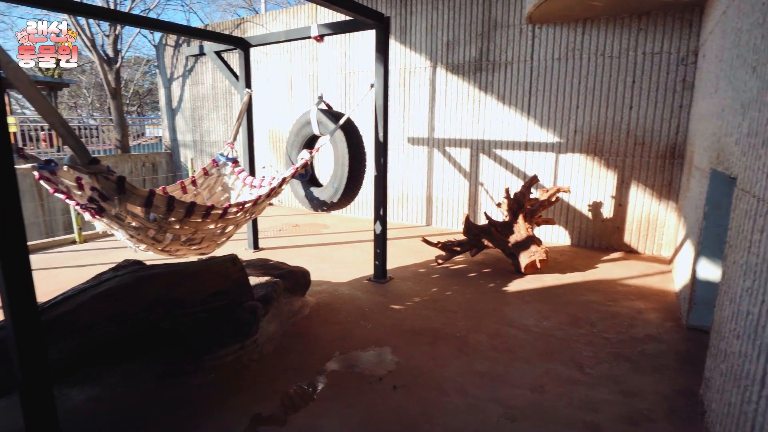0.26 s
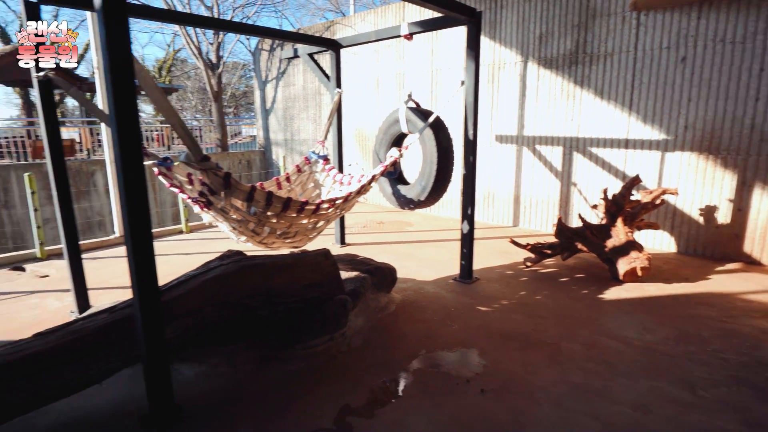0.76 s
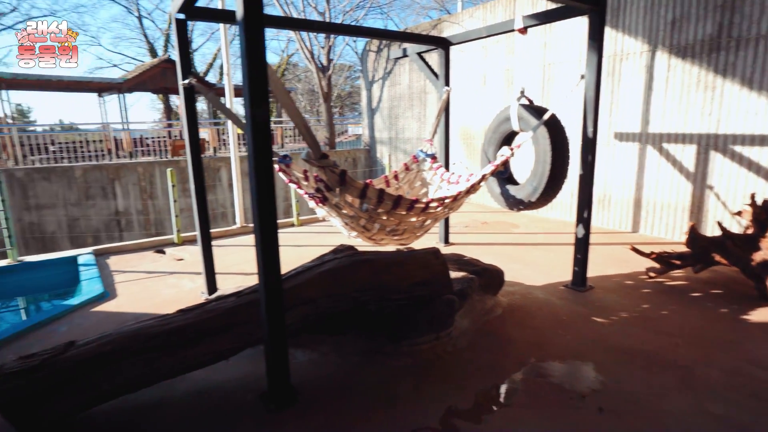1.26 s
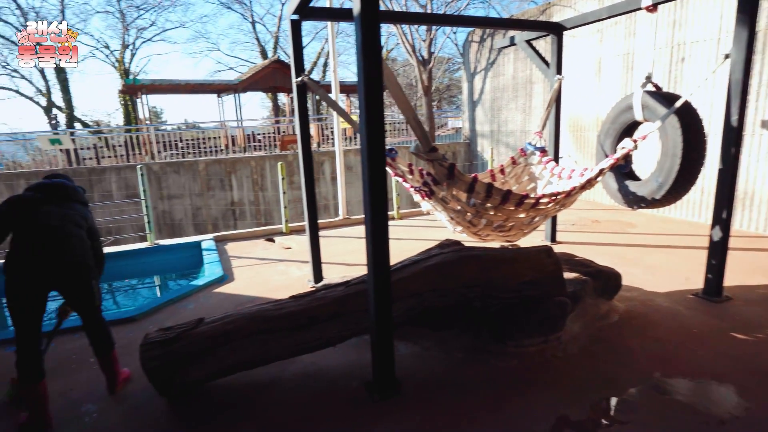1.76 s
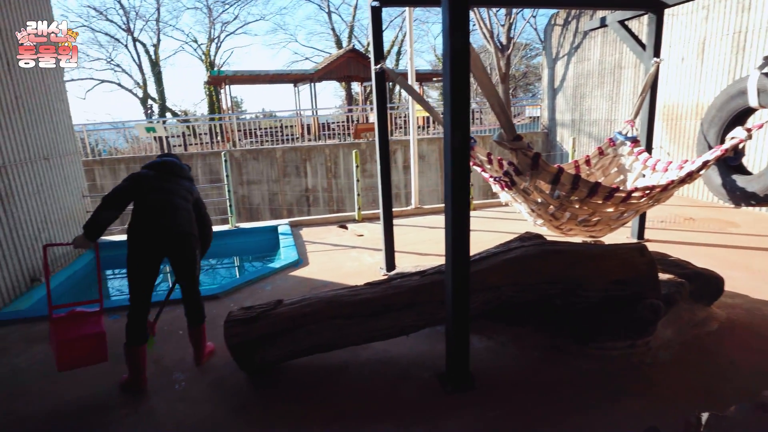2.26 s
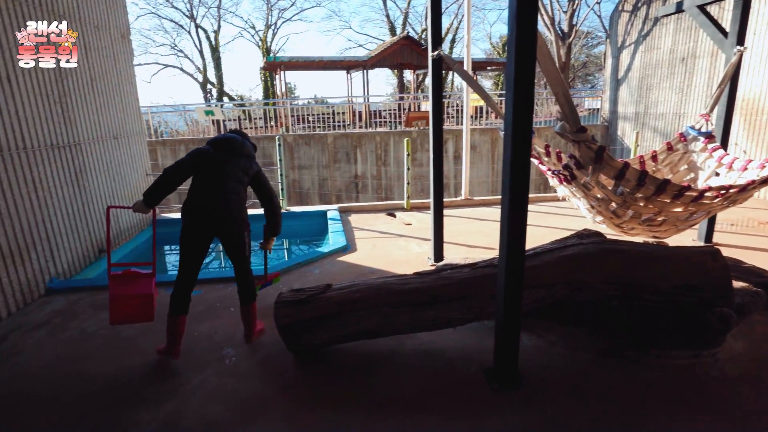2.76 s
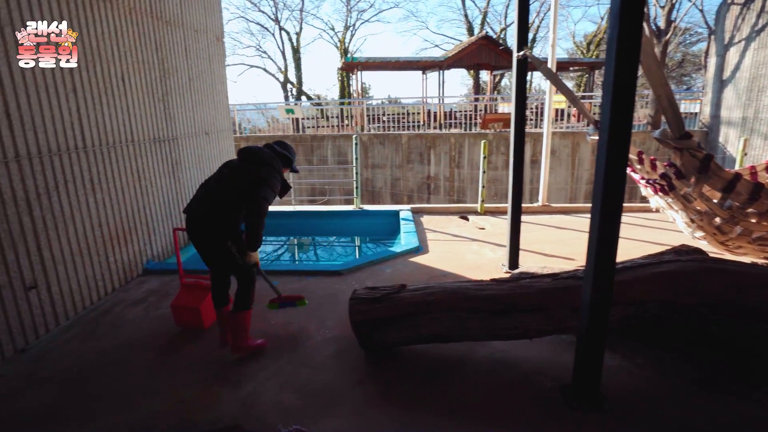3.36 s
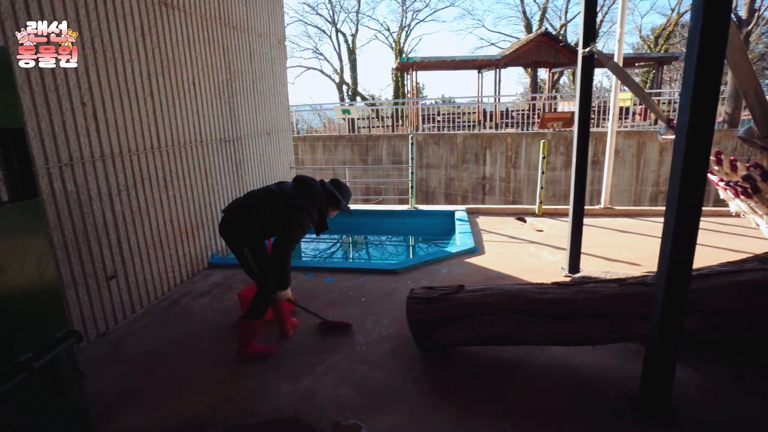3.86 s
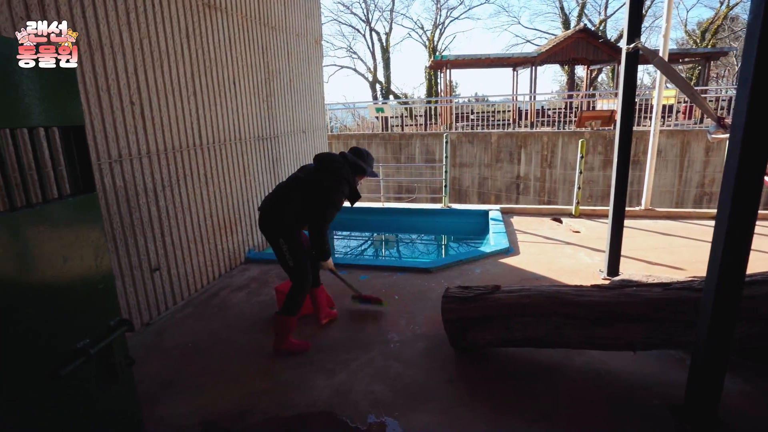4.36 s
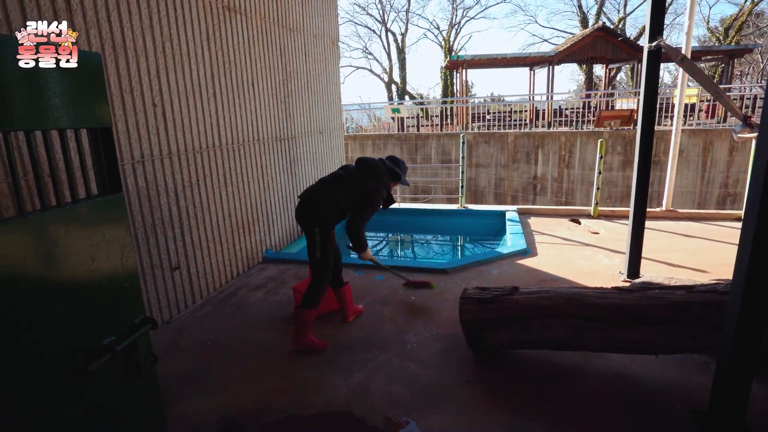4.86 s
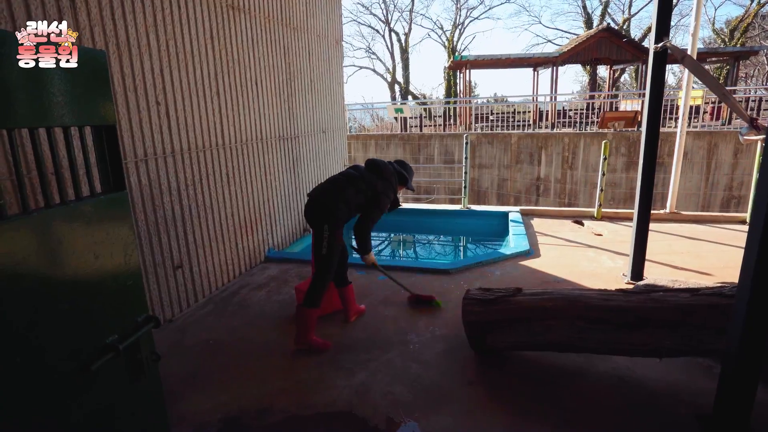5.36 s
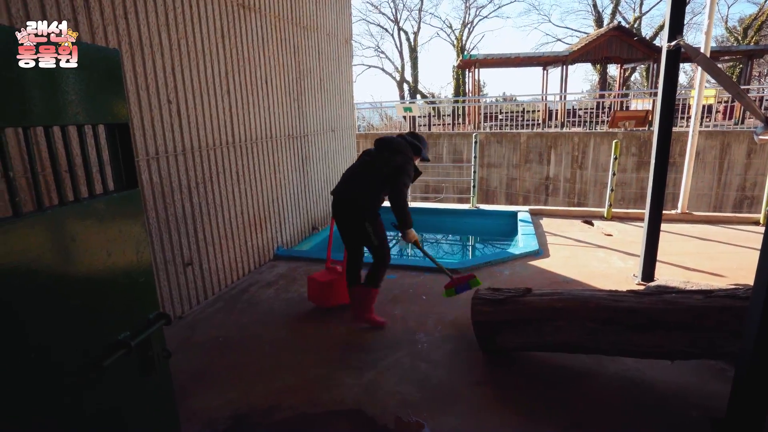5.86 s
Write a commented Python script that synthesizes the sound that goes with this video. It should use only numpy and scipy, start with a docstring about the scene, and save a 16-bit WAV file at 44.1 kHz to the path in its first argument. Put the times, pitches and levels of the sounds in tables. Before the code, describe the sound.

A plastic dustpan bumps and clatters, then bristles scrape gritty concrete in repeated bright strokes, with faint outdoor hush and short wall echoes.

```python
"""A plastic broom sweeps a cement floor in a walled outdoor yard, a few metres from two close microphones.
A faint outdoor hush, drifting filtered noise, lies under everything. At first a hollow plastic dustpan bumps
about (ringing modes of plastic and yard, a noisy clatter) while boots scuff (stick-slip snaps) and bristles land.
Then longer strokes take over: bristle tips rasp along the grit as dense snaps that swell and fade, with
the pressure easing off. The walls answer with a short tail of scattered echoes."""
import sys
import numpy as np
from scipy import signal
from scipy.fft import rfft, irfft
from scipy.io import wavfile

SR = 44100
rng = np.random.default_rng(int(sys.argv[2]) if len(sys.argv) > 2 else 0)


def master_out(mix):
    """Clip the mix to full scale and print it as 16-bit PCM to the path in sys.argv[1]."""
    frames = np.transpose(np.atleast_2d(mix))
    ceiling = np.clip(frames, -1, 1)
    pcm = np.round(ceiling * 32767).astype(np.int16)
    wavfile.write(sys.argv[1], SR, pcm)


N = 269010
TIME = np.arange(N) / SR
FREQS = np.fft.rfftfreq(N, 1 / SR)

# colour of bristle tips on grit: freq_hz, level_db
BRISTLE_HISS = [(300, -43), (900, -9), (1500, -7.5), (2100, -4), (3000, -2.5), (4500, -0.5), (6500, -1),
                (8700, -2.5), (10500, 0), (12500, 1.9), (15500, -1)]
# colour of rubber and plastic dragged over cement: freq_hz, level_db
SOLE_COLOUR = [(60, -31), (150, 4), (300, 1.5), (700, -2), (1200, -5), (2200, -25), (3500, -38),
               (7000, -32), (16000, -21)]
# ringing modes of the knocks, the hollow plastic and the yard's low resonances together:
# freq_hz, level_db (relative), t60_s (before each blow's length factor)
KNOCK_MODES = [(94, -5, 0.44), (129.5, -5.5, 0.47), (156.5, -0.5, 0.12), (162.9, -0.5, 0.45),
               (176.2, -4, 0.7), (233.3, -3, 0.85), (249.6, -7, 0.95), (284.6, 9, 0.25), (351.6, 3.5, 0.18),
               (388, -10.5, 0.55), (431.8, -2.5, 0.24), (479, -18.5, 0.34), (569, -2.5, 0.056),
               (779, -2.5, 0.26), (838, -13, 0.24), (952, -6, .3), (1310, -5.5, 0.45), (1870, 0, 0.16)]


def gain_of(db):
    """Decibels to amplitude."""
    return 10 ** (np.asarray(db) / 20)


def evened(x):
    """Scales to rms 1."""
    return x / np.sqrt(np.mean(x ** 2) + 1e-20)


def read(points, hz):
    """Reads a table along log frequency."""
    f, value = np.transpose(points)
    return np.interp(np.log(hz + 1), np.log(f + 1), value)


def add(mix, s, sound):
    """Mixes a sound in at time s."""
    part = mix[max(round(s * SR), 0):][:len(sound)]
    part += sound[:len(part)]


def colour(x, spectrum):
    """Filters x by a table of decibels, then scales it to rms 1."""
    return evened(irfft(rfft(x) * gain_of(read(spectrum, FREQS)), N))


def wander(rate_hz):
    """Slow random drift of rms 1, with little motion faster than rate_hz."""
    return evened(irfft(rfft(rng.standard_normal(N)) / (1 + (FREQS / rate_hz) ** 4), N))


def ports(pair, likeness):
    """Two close microphones share part of each band; a phase lead on the left sets them apart in time."""
    # phase between the microphones: freq_hz, left_lead_rad
    left_lead = [(100, 0), (3000, 0.12), (6000, 0), (9000, 1.0), (15000, 1.0)]
    a, b = rfft(pair)
    same = np.clip(read(likeness, FREQS), -1, 1)
    mid = a * np.sqrt((1 + same) / 2)
    side = b * np.sqrt((1 - same) / 2)
    left = mid + side
    right = (mid - side) * np.exp(-1j * read(left_lead, FREQS))
    return irfft(np.array([left, right]), N)


def slips(per_s, spread_db):
    """Tiny stick-slip snaps at random instants and of uneven size, as both microphones get them."""
    # how alike the microphones hear a nearby source: freq_hz, likeness (1 is identical)
    near_likeness = [(100, 0.94), (1200, 1), (2800, 0.91), (5500, 0.44), (9000, 0.071), (15000, 0.1)]
    size = gain_of(spread_db * np.minimum(rng.exponential(1, N), 5))
    struck = rng.random(N) < per_s / SR
    return evened(ports(size * struck * rng.standard_normal((2, N)), near_likeness))


def swing(start, rise, fall, ease_in, ease_out):
    """Speed of one movement, 0 to 1: up a quarter sine, then down another, each raised to a power."""
    t = TIME - start
    moving = (t > 0) & (t < rise + fall)
    t = t[moving]
    speed = np.zeros(N)
    arc = np.sin(np.pi / 2 * np.interp(t, [0, rise, rise + fall], [0, 1, 0]))
    speed[moving] = arc ** np.where(t < rise, ease_in, ease_out)
    return speed


def hush():
    """Distant outdoor rumble that drifts in level, under a thin even hiss."""
    # colour of the open air: freq_hz, level_db
    air_colour = [(15, -29), (25, -12), (75, -6), (93, -13.5), (156, -9), (221, -13), (246, -14.5),
                  (445, -17), (782, -18.5), (919, -19), (1170, -20.5), (1750, -22), (2170, -22),
                  (3260, -22.5), (15500, -24)]
    # how alike the microphones hear the open air: freq_hz, likeness (1 is identical)
    air_likeness = [(60, 0.76), (180, 0.85), (550, 0.7), (1650, 0.32), (4970, 0), (15000, 0.0)]
    air = colour(ports(rng.standard_normal((2, N)), air_likeness), air_colour)
    rumble = signal.sosfiltfilt(signal.butter(2, 500, fs=SR, output="sos"), air)
    drift = gain_of(3.0 * wander(rate_hz=7.9))
    return gain_of(-57.5) * (air + rumble * (drift - 1))


def yard(x):
    """Echoes from floor and walls: scattered random reflections, each band dying at its own speed."""
    # decay of the walled yard: freq_hz, t60_s
    decay = [(150, 1), (400, 0.71), (1500, 0.71), (4000, 0.57), (14000, 0.43)]
    # how alike the microphones hear the echoes: freq_hz, likeness (1 is identical)
    echo_likeness = [(100, 0.49), (160, 1), (280, 1), (1200, 0.99), (2800, 0.84), (5500, 0.21), (9000, 0.2),
                     (15000, .45)]
    arrives = (rng.random((2, N)) < 3000 / SR) * (TIME > .012)  # reflections per second, first gap in s
    taps = rng.standard_normal((2, N)) * arrives
    hz, t, bands = signal.stft(taps, SR, nperseg=256)
    fading = bands * gain_of(-60 * t / read(decay, hz)[:, None])
    tail = signal.istft(fading, SR, nperseg=256)[1][:, :N]
    tail = ports(tail, echo_likeness)[:, :SR]
    tail = tail / np.linalg.norm(tail[0])
    return signal.fftconvolve(x[:1], tail, axes=1)[:, :N]  # the left channel feeds both sides


def scraped_modes(x):
    """Scraping drives the knocks' modes, of plastic and yard together, broadened by contact with the floor."""
    response = 0
    for k, (hz, db, t60) in enumerate(KNOCK_MODES):
        sign = (-1) ** k  # neighbouring modes swing against each other
        response = response + sign * gain_of(db) * hz ** 1.05 / (1 + 2j * (FREQS - hz) / (hz * 0.047))
    return colour(irfft(rfft(x) * response, N), SOLE_COLOUR)


def boots():
    """Rubber soles and the dustpan's edge judder over the cement and drag some grit along."""
    # scuffs: start_s, rise_s, fall_s, level_db, grit_db (relative to the scuff)
    scuffs = [ (0.524, 0.027, 0.05, -39.5, -7), (0.564, 0.017, 0.08, -37.5, -15),
              (.62, 0.05, .11, -43, -18), (1.61, 0.06, 0.077, -50.5, 1), (3.234, 0.057, 0.098, -49, -14.5),
              (3.69, 0.02, 0.069, -53, -14), (6.045, 0.0078, 0.081, -56.5, 0.5), ]
    # colour of dragged grit: freq_hz, level_db
    grit_colour = [(500, -13), (1500, 4.5), (2200, 7.5), (4000, -3.5), (6500, -2), (10000, -18),
                   (16000, -16)]
    ease_in, ease_out = 0.97, 5  # how gently a sole catches and lets go (powers of a sine arc)
    rubber = colour(slips(per_s=6300, spread_db=1.0), SOLE_COLOUR)
    plastic = scraped_modes(slips(per_s=1500, spread_db=0.5))
    grit = colour(slips(per_s=5600, spread_db=-4.0), grit_colour)
    rub = gain_of(-2.5) * rubber + gain_of(-6) * plastic
    drag = np.zeros((2, N))
    for start, rise, fall, db, grit_db in scuffs:
        speed = swing(start, rise, fall, ease_in, ease_out)
        drag += gain_of(db) * speed * (rub + gain_of(grit_db) * grit)
    return drag * gain_of(0.79 * wander(rate_hz=110))  # the scuffs flutter


def bumps(octaves):
    """Each blow rings plastic and yard around one pitch and shakes loose parts into a short clatter."""
    # blows: start_s, level_db, pitch_hz (favoured), clatter_db (relative to level_db), length (factor on decays)
    blows = [(0.049, -43.5, 269, -9.5, 2.5), (0.201, -26, 410, -9.5, 1.16), (0.232, -37, 546, -20, 1.1),
             (0.297, -35, 341, -6, 0.9), (0.318, -23.5, 275, -30, 0.51), (0.537, -32.5, 286, -4, 0.36),
             (0.575, -46, 146, -1, 1.1), (0.649, -39.5, 207, 2, 0.32), (0.688, -39, 683, -9, 0.83),
             (.892, -18.5, 168, -19.5, 1.02), (.898, -18.5, 291.5, -21.5, 0.69),
             (0.919, -26, 419, -19, 1.2), (0.962, -33.5, 140, -20, 1), (1.075, -36.5, 254, -15, 0.58),
             (1.142, -35.5, 256.5, -32, 0.61), (1.262, -55.5, 585, 2, 3.2), (1.418, -51, 244.6, -20, 0.64),
             (1.55, -47.5, 273, -8.5, 0.65), (1.638, -38.5, 308, -12.5, 0.4), (1.872, -50.5, 298, -8, 0.85),
             (3.088, -50.5, 290, 1.5, 0.18), (3.119, -48, 270, -3, .13), (3.276, -52, 168, 0, 0.2),
             (3.525, -52.5, 222, -0.5, 0.82), (3.638, -34.5, 179, -14, 0.81), (4.051, -42, 216, -1, 0.37),
             (4.513, -43, 317, -2, 0.45), (6.047, -51.5, 350, -4.5, 1.7)]
    # colour of the loose parts: freq_hz, level_db
    clatter_colour = [(60, -41), (125, 8.5), (450, 4), (800, -6), (1300, -9), (2000, -16.5), (3400, -22.5),
                      (8000, -31), (16000, -32)]
    t = np.arange(SR) / SR
    ring, shake = np.zeros(N), np.zeros(N)
    hz, mode_db, t60 = np.transpose(KNOCK_MODES)[:, :, None]
    sign = (-1) ** np.arange(len(KNOCK_MODES))[:, None]  # neighbouring modes swing against each other
    contact = 1 - np.exp(-t / 0.0025)  # soft plastic takes a moment to give
    for s, db, pitch_hz, clatter_db, length in blows:
        weight = gain_of(mode_db) / (1 + (np.log2(hz / pitch_hz) / octaves) ** 2)
        modes = weight * sign * gain_of(-60 * t / (t60 * length)) * np.sin(2 * np.pi * hz * t)
        body = modes.sum(0) / np.linalg.norm(weight)
        push = np.sin(2 * np.pi * pitch_hz * t) * np.exp(-t / 0.021)  # the dull blow itself
        add(ring, s, gain_of(db) * contact * (gain_of(-0.5) * body + gain_of(-4.0) * push))
        add(shake, s, gain_of(db + clatter_db - 60 * t / (0.28 * length)))
    return ring + shake * colour(slips(per_s=3000, spread_db=-2.5), clatter_colour)


def head(x):
    """Snaps pass the broad resonances of the plastic broom head."""
    # head resonances: freq_hz, width_hz, level_db
    resonances = [(344, 200, -13), (716, 99, -2), (1090, 125, 1), (1342, 198, 2.5), (1963, 510, -2),
                  (2420, 180, 2), (3400, 890, -6)]
    response = 0
    for k, (hz, width, db) in enumerate(resonances):
        peak = gain_of(db) / (1 + 2j * (FREQS - hz) / width)
        response = response + peak * FREQS / (FREQS + hz) * (-1) ** k  # thinner bass, alternating sign
    return evened(irfft(rfft(x) * response, N))


def landings():
    """The bristles hit the floor within a few milliseconds and settle in a fading burst of snaps."""
    # landings: start_s, level_db, t60_s
    touchdowns = [(.108, -55, 0.043), (0.895, -47.5, 0.1), (0.916, -40.5, 0.24), (0.961, -51, 0.28),
                  (1.262, -54, 0.074), (1.819, -49.5, 0.15), (3.567, -44.5, 0.084), (3.718, -52, .08),
                  (4.48, -42, 0.28), (5.004, -45, 0.33), (5.386, -42.5, 0.23), (6.046, -52.5, 0.18)]
    t = np.arange(SR // 3) / SR
    swell = np.zeros(N)
    for s, db, t60 in touchdowns:
        add(swell, s, gain_of(db - 60 * t / t60) * (1 - np.exp(-t / 0.0016)))
    snaps = slips(per_s=6900, spread_db=-4.5)
    return swell * (colour(snaps, BRISTLE_HISS) + gain_of(-8.5) * head(snaps))


def resonate(x, hz, width):
    """A resonance that follows the curve hz: shift down, smooth, shift back up."""
    turn = np.exp(2j * np.pi * np.cumsum(hz) / SR)
    r = np.exp(-np.pi * width / SR)
    return evened((turn * signal.lfilter([1 - r], [1, -r], x / turn)).real)


def broom():
    """Bristle tips snap over the grit and ring as they flick free; pressure drives the head into a rasp."""
    # strokes: start_s, rise_s, fall_s, level_db, pressure_db (low rasp, relative, at peak speed),
    # sheen_db (treble above about 6 kHz, at peak speed), ring_hz (bristles), ring_db (relative)
    strokes = [ (0.0, 0.0017, 0.33, -48.5, -5, -4, 3430, -15),
               (0.453, 0.046, 0.13, -44, -13.5, -1, 4120, -22),
               (1.8, 0.25, 0.19, -39, -14, -5, 2120, -11.5),
               (2.403, 0.13, 0.25, -37.5, -14.5, -7, 2020, -16),
               (3.518, 0.097, 0.25, -45, -1.5, -6.5, 2150, -29),
               (3.746, 0.35, 0.16, -37, -7.5, 1.5, 4100, -13.5),
               (4.493, 0.14, 0.28, -36.5, -6.5, 1.5, 4420, -11.5),
               (5.015, 0.11, 0.21, -38.5, -5, 2.5, 3150, -15),
               (5.406, 0.094, 0.23, -38, -7, 2, 4170, -13.5), ]
    ease_in, ease_out = 1.96, 2.98  # how gently the arm starts and stops (powers of a sine arc)
    easing_db_per_s = 24  # the pressure eases off through a stroke
    brightening_db_per_s = 10.5  # the broom tips onto its bristle ends
    grip = 0.71  # the whole stroke levels off at speed as the bristles bend over
    hiss = colour(slips(per_s=24000, spread_db=-0.5), BRISTLE_HISS)
    top = signal.sosfiltfilt(signal.butter(1, 6000, "high", fs=SR, output="sos"), hiss)
    rasp = head(slips(per_s=6000, spread_db=0.0))
    flicks = slips(per_s=20000, spread_db=1.5)
    bend = 1 + 0.011 * wander(rate_hz=20)  # the ring wavers in pitch
    out = np.zeros((2, N))
    for start, rise, fall, db, pressure_db, sheen_db, ring_hz, ring_db in strokes:
        speed = np.tanh(grip * swing(start, rise, fall, ease_in, ease_out)) / np.tanh(grip)
        on = speed > 0
        past_peak = TIME[on] - start - rise  # seconds, negative while speeding up
        sheen = gain_of(sheen_db + brightening_db_per_s * past_peak)
        tips = hiss[:, on] + top[:, on] * (sheen - 1)
        ring = gain_of(ring_db) * resonate(flicks[:, on], ring_hz * bend[on], width=240)
        pressure = gain_of(pressure_db - easing_db_per_s * past_peak)
        stroke = gain_of(2.0) * tips + ring + gain_of(-3.5) * pressure * rasp[:, on]
        out[:, on] += gain_of(db) * speed[on] * stroke
    return out * gain_of(0.65 * wander(rate_hz=39))  # the level flickers


def bounce(x, delay_s, db):
    """The hard floor sends up a slightly later copy."""
    return irfft(rfft(x) * (1 + gain_of(db) * np.exp(-2j * np.pi * FREQS * delay_s)), N)


def scene():
    """The sweeper in the yard: broom, boots and dustpan, their echoes and the open air."""
    sweep = bounce(broom() + landings(), delay_s=.0027, db=-22.5)
    steps = boots()
    knocks = bumps(octaves=0.46)
    echoes = yard(gain_of(-12) * sweep + gain_of(-7.0) * steps + gain_of(-11) * knocks)
    placed_knocks = knocks * gain_of([[.6], [-.6]])  # dB left and right: a little to the left
    return sweep + steps + placed_knocks + echoes + hush()


def record(dry):
    """The recorder's band limit: a steep low-pass."""
    edge_hz = 15850
    low_pass = signal.firwin(701, edge_hz, window=("kaiser", 9), fs=SR)
    return signal.oaconvolve(dry, low_pass[None], "same")


dry = scene()
out = record(dry)
master_out(out)
```